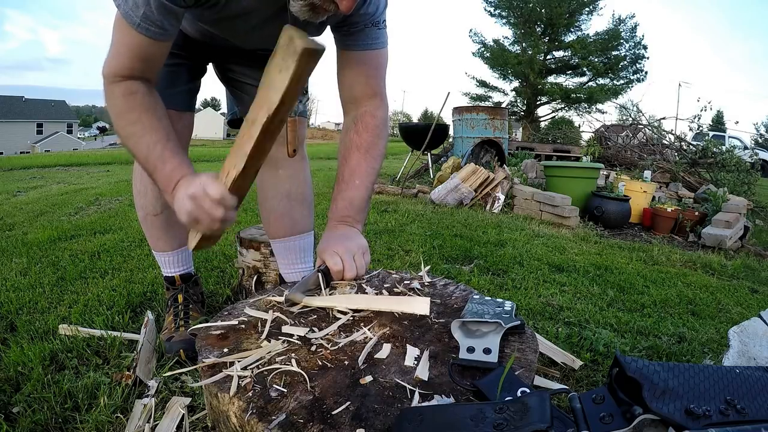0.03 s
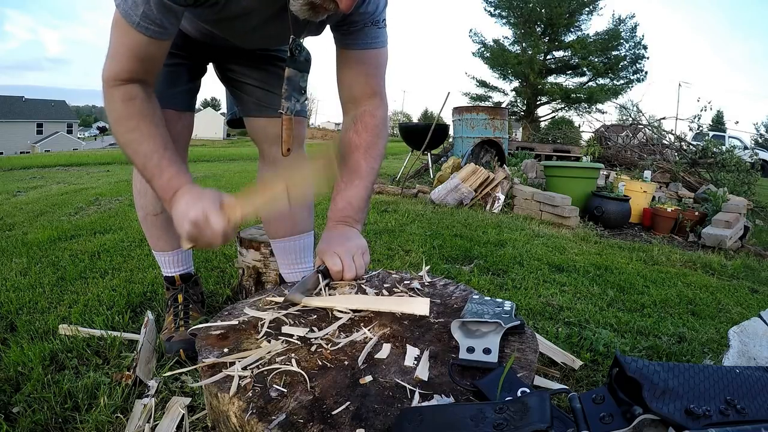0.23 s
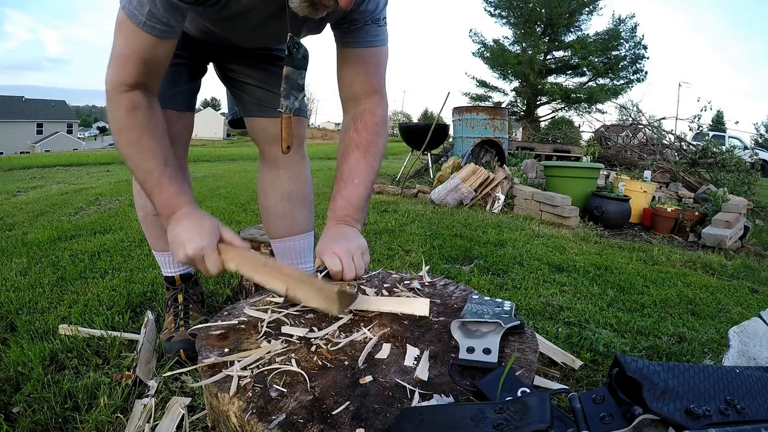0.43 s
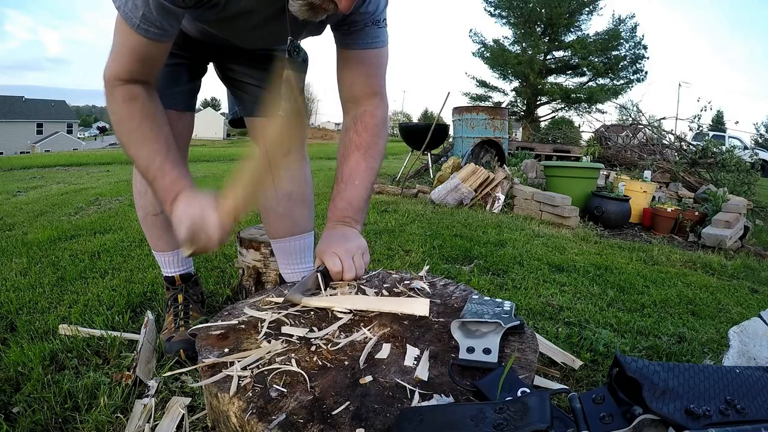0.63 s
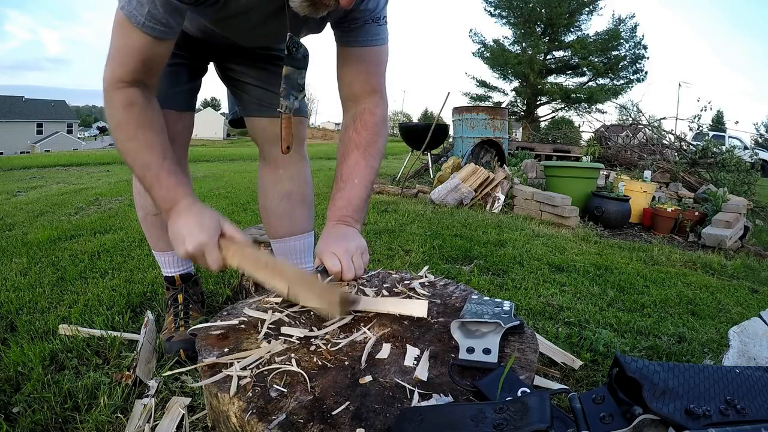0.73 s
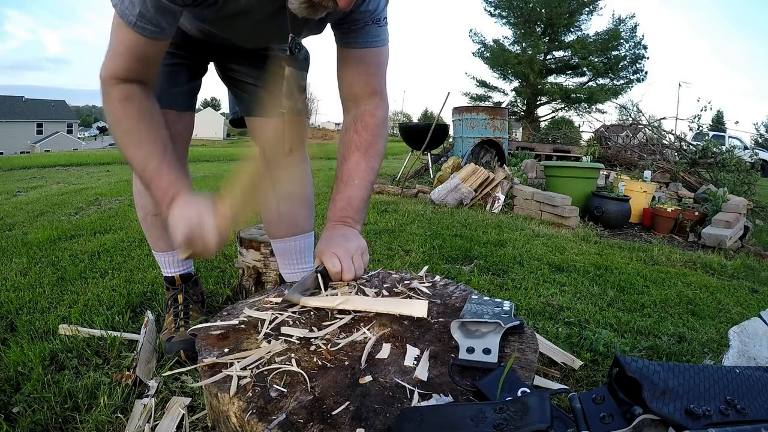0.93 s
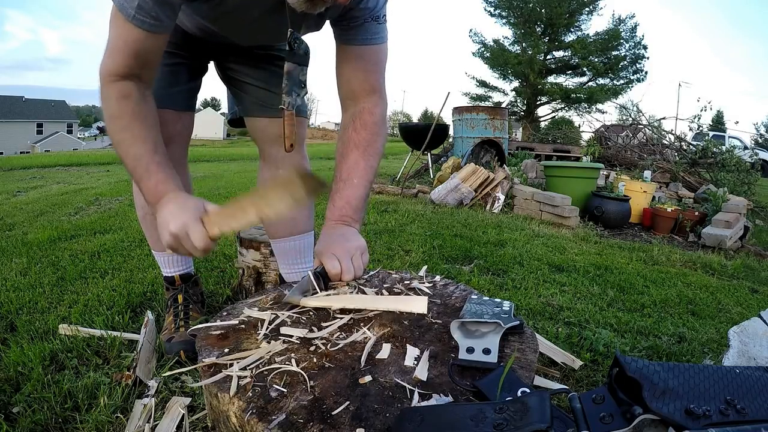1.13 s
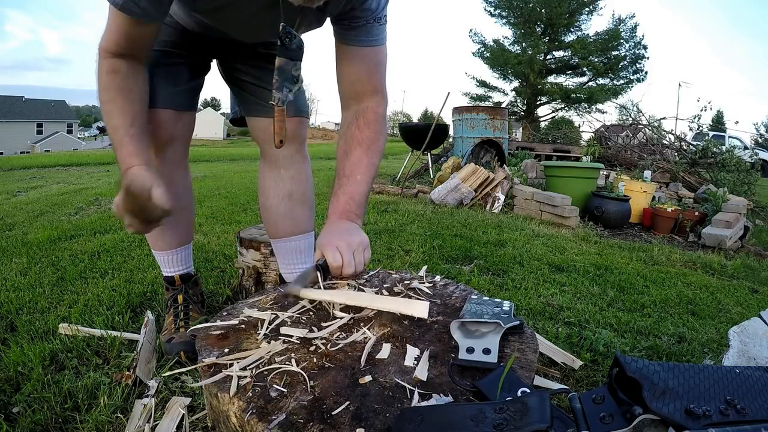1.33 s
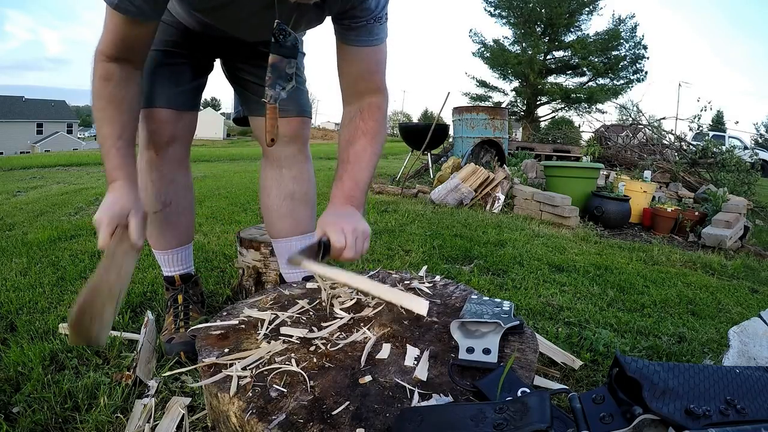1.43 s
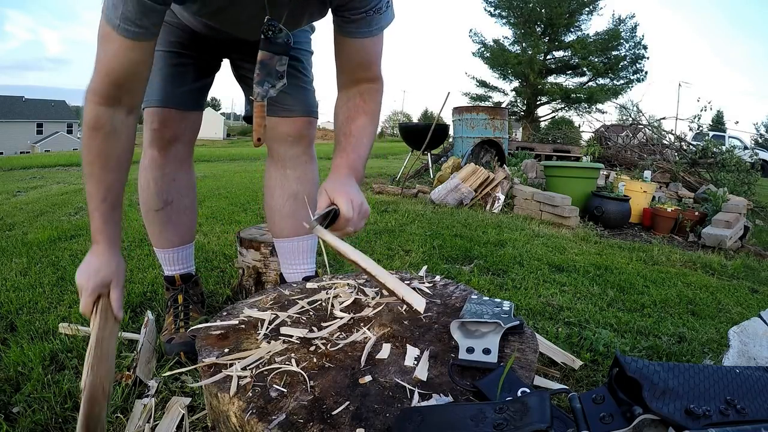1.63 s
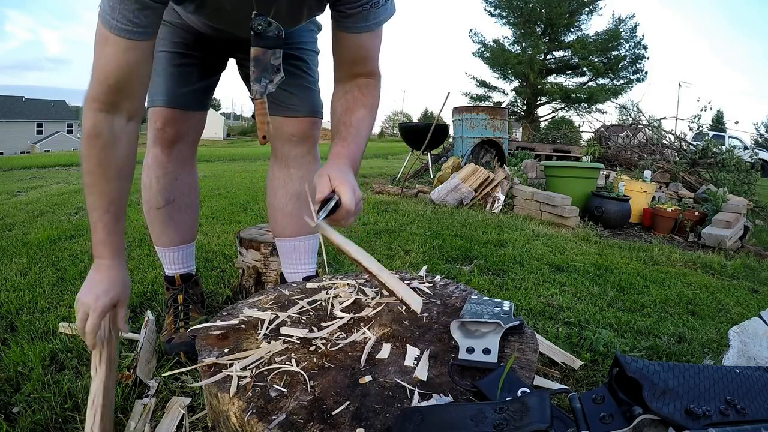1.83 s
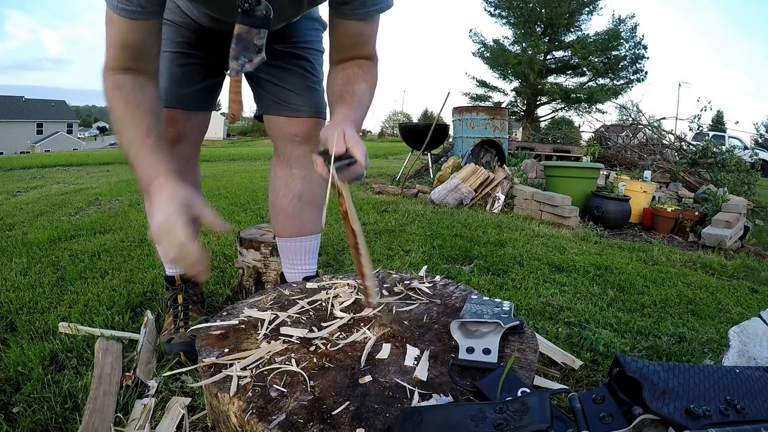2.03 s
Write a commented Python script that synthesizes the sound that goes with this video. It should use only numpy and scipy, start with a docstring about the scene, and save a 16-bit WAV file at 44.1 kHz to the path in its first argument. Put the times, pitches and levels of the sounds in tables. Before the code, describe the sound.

Wooden baton knocks a knife through a stick on a stump, four hard sharp blows outdoors

```python
"""Outdoors, close to a small camera that overloads: a wooden baton knocks a knife spine into a stick on a stump.
Each blow rings wood, blade and stump as dying sines, with noise for the crack and rattle; the baton bounces softly.
Far walls and trees send thin echoes back, and coloured noise makes wind and air.
The split stick ticks and the blade rubs at the end; thin high notes and a faint pulsing whine lie above."""
import sys
import numpy as np
from scipy import signal
from scipy.io import wavfile

SR = 44100
rng = np.random.default_rng(int(sys.argv[2]) if len(sys.argv) > 2 else 0)


def generate_wav(signal):
    """Clip the signal to [-1, 1] and save it as 16-bit WAV at the path in sys.argv[1]."""
    frames = np.transpose(np.atleast_2d(signal))
    scaled = np.clip(frames, -1, 1) * 32767
    pcm = np.round(scaled).astype(np.int16)
    wavfile.write(sys.argv[1], SR, pcm)


def volts(x):
    """Linear amplitude factor 10**(x/20) for a level x in dB, scalar or array-like."""
    e = np.asarray(x, float) / 20
    return 10 ** e


N = 92610  # samples, 2.1 s


def curve(points, x):
    """Straight lines between the points of a table."""
    return np.interp(x, *np.transpose(points))


def colour(x, points):
    """Causal minimum-phase filter of unit energy, drawn from a spectrum of relative levels."""
    point_hz, point_db = np.transpose(points)
    bin_hz = np.abs(np.fft.fftfreq(8192, 1 / SR))
    bin_db = np.interp(np.log(bin_hz + 1), np.log(point_hz + 1), point_db)
    log_gain = np.log(volts(np.maximum(bin_db, -100)))
    phase = -signal.hilbert(log_gain).imag
    taps = np.fft.ifft(np.exp(log_gain + 1j * phase)).real[:4096]
    return signal.oaconvolve(x, taps / np.linalg.norm(taps))[:len(x)]


def add(mix, start_s, sound):
    """Lays a sound into the mix in place, cut off where the mix ends."""
    part = mix[round(start_s * SR):][:len(sound)]
    part += sound[:len(part)]


def ring(modes, t, detune):
    """Struck body: dying sines, each off its listed pitch by up to the share detune."""
    pitch_factors = 1 + detune * (2 * rng.random(len(modes)) - 1)
    total = 0
    for (pitch_hz, level_db, t60_s, swing), factor in zip(modes, pitch_factors):
        envelope = volts(level_db - 60 * t / t60_s)
        total = total + np.sign(swing) * envelope * np.sin(2 * np.pi * pitch_hz * factor * t)
    return total


def lumpy(rate_hz, depth_db):
    """Noise whose level wanders between random steps."""
    steps = rng.standard_normal(2000)
    wander = np.interp(np.arange(N) / SR * rate_hz, np.arange(2000), steps)
    return volts(depth_db * wander) * rng.standard_normal(N)


def blow(strength_db, crack_db, thud_db, blade_db):
    """Wood, blade and stump ring at once with a crack; the ground follows, a rattle outlasts the crack."""
    # Mode tables: pitch_hz (before detuning), level_db (relative), t60_s, first swing (out 1, in -1)
    # Baton and stick
    wood_modes = [(640, -2, 0.033, 1), (918, -13, 0.052, -1), (982, -2, 0.023, 1), (1415, -10.5, 0.033, -1),
                  (1677, -3, 0.015, -1), (1861.5, 8.5, 0.0065, -1), (2094, 3, 0.011, 1),
                  (2826, -0.5, 0.015, 1), (3220, -7.5, .017, 1), (3281, -6.5, 0.008, 1),
                  (3880, -24, .02, -1), (4387, -17.5, 0.014, -1), (4830, -11.5, 0.018, -1)]
    # Blade, freer as the stick splits
    blade_modes = [(1320, -4, .017, -1), (2150, -11, .03, 1), (2557, 0, .016, 1), (4330, -7, .02, -1),
                   (4520, -8, .018, -1), (5120, -11, .02, 1), (5520, -16, .016, -1)]
    # Stump
    stump_modes = [(187.5, -8.5, 0.045, 1), (257.6, -16, 0.079, 1), (314, -3, 0.051, 1),
                   (421, -4, 0.031, 1), (500, -11, 0.037, -1), (602, -11, 0.019, 1)]
    # The soil's shudder through the camera stand
    ground_modes = [(59, -15, .28, 1), (71, -17, 0.21, 1)]
    # Spectrum of the crack: frequency_hz, level_db (relative, per Hz)
    crack_colour = [(500, -25.5), (1000, -9), (1850, 1.5), (3300, 3), (4400, -10), (6000, -16),
                    (8000, -24.5), (13300, -23.5), (16000, -47)]
    # Spectrum of shavings and near ground rattling: frequency_hz, level_db (relative, per Hz)
    rattle_colour = [(240, -11), (400, 21), (588, -20.5), (1010, -12.5), (1250, -27.5), (4440, -34.5),
                     (14100, -43), (16000, -59)]
    detune = .012  # share of the pitch
    ring_level_db, thud_level_db, ring_rise_s = -1, -0.5, .00015
    ground_lag_s, ground_rise_s = .0025, .003
    crack_level_db, crack_t60_s, crack_rise_s = -11, .022, .0005
    rattle_level_db, rattle_t60_s = -17.5, 0.067

    t = np.arange(SR // 3) / SR
    wood = ring(wood_modes, t, detune)
    blade = volts(blade_db) * ring(blade_modes, t, detune)
    stump = ring(stump_modes, t, detune)
    late = np.maximum(t - ground_lag_s, 0)
    ground = (1 - np.exp(-late / ground_rise_s)) * ring(ground_modes, late, detune)
    body = volts(ring_level_db) * (wood + blade) + volts(thud_level_db + thud_db) * (stump + ground)
    body = (1 - np.exp(-t / ring_rise_s)) * body

    crack_noise, rattle_noise = rng.standard_normal((2, len(t)))
    crack_fade = volts(crack_level_db + crack_db - 60 * t / crack_t60_s)
    crack = crack_noise * (1 - np.exp(-t / crack_rise_s)) * crack_fade
    rattle = rattle_noise * volts(rattle_level_db - 60 * t / rattle_t60_s)
    return volts(strength_db) * (body + colour(crack, crack_colour) + colour(rattle, rattle_colour))


def bounce(*levels_db):
    """The baton settling back on the spine: a blow that lands softly and dull."""
    settle_s, soft_hz = .0015, 3520
    dull = signal.lfilter(*signal.butter(1, soft_hz, fs=SR), blow(*levels_db))
    t = np.arange(len(dull)) / SR
    return dull * (1 - np.exp(-t / settle_s))


def knocks(lead_s):
    """All blows and bounces, with a lead-in for the blow that falls just before the start."""
    # Blows: start_s, strength_db, crack_db, thud_db, blade_db (all relative)
    blow_times = [(-.0695, 1, 3, 0, -8), (.21255, 0, 5, 0, -12), (.49085, 0, 6, -1, -6),
                  (.77015, 0, 5, 0, -8), (1.06655, 0, 8, -4, 0)]
    # Bounces: start_s, strength_db, crack_db, thud_db, blade_db (all relative)
    bounce_times = [(.244, -20, 2, 3.5, -12.5), (.505, -32, 13, 0.5, -0.5), (.527, -21.5, 0.5, 5.5, -12.5),
                    (.785, -31, 5, 1.5, -9.5), (0.794, -14.5, 0, 3.5, -11), (.812, -38, -1, 3, -11.5),
                    (1.076, -25, 7, -4.5, 2), (1.11, -51, 0, 9, 8)]
    out = np.zeros(N + lead_s * SR)
    for start_s, *levels_db in blow_times:
        add(out, start_s + lead_s, blow(*levels_db))
    for start_s, *levels_db in bounce_times:
        add(out, start_s + lead_s, bounce(*levels_db))
    return out


def forerunner(x):
    """A faint copy of the knocks that arrives ahead of them, likely through stump and soil."""
    early_s, early_db = 0.0025, -35
    return volts(early_db) * np.roll(x, -round(early_s * SR))


def yard(x):
    """A few walls and clumps of trees return the knocks, thin and late."""
    # Far walls: delay_s, level_db (relative)
    walls = [(.1022, -53), (.132, -58), (.160, -59), (.211, -59), (.2225, -57), (.327, -67)]
    # Scatter from trees: delay_s, level_db (relative)
    trees = [(.1, -100), (.115, -88), (.16, -88), (.23, -90), (.26, -98), (.4, -110)]
    # Colour of what returns: frequency_hz, level_db (relative, per Hz)
    far_colour = [(800, -42.5), (1300, -19), (2200, -6.5), (2800, -4), (3300, 4), (3900, -0.5),
                  (4400, -5.5), (6000, 1), (8000, -24), (12000, -60.5)]
    t = np.arange(SR // 2) / SR
    first_scatter_s = trees[0][0]
    echoes = volts(curve(trees, t)) * lumpy(150, 2.5)[:len(t)] * (t > first_scatter_s)
    for delay_s, level_db in walls:
        add(echoes, delay_s, volts(np.array([level_db])))
    return signal.fftconvolve(x, colour(echoes, far_colour))[:len(x)]


def tick(level_db, pitch_hz, snap_db):
    """A small dry tap: a few dying sines and a snap of noise."""
    # Modes of a tap: pitch_ratio (before detuning), level_db (relative), t60_s, first swing (out 1, in -1)
    tap_modes = [(.45, -8, 0.022, 1), (1, -3.5, 0.043, -1), (1.16, -8, .02, 1), (1.62, -0.5, 0.0052, -1)]
    # Spectrum of the snap: frequency_hz, level_db (relative, per Hz)
    snap_colour = [(800, -13), (2000, 2.5), (4000, 1.5), (8000, -12), (12000, -9.5), (15000, -19),
                   (16500, -30)]
    snap_t60_s = 0.051
    t = np.arange(SR // 10) / SR
    snap = volts(snap_db - 60 * t / snap_t60_s) * rng.standard_normal(len(t))
    modes = [(ratio * pitch_hz, *rest) for ratio, *rest in tap_modes]
    return volts(level_db) * (ring(modes, t, 0.016) + colour(snap, snap_colour))


def ticks():
    """Stick and knife tick as the split stick comes apart."""
    # Ticks: start_s, level_db (relative), pitch_hz (before ratio and detuning), snap_db (relative)
    tick_times = [(1.37, -65, 2036, 4), (1.565, -62, 1700, 1.5), (1.867, -62.5, 2120, -0.5),
                  (1.872, -56.5, 4300, -1.5), (1.9144, -50, 1860, -0.5), (1.9852, -32.5, 2216, -18),
                  (2.008, -43, 1830, -5.5), (2.013, -51.5, 3100, -15.5), (2.028, -51, 1750, -7.5)]
    out = np.zeros(N)
    for start_s, *settings in tick_times:
        add(out, start_s, tick(*settings))
    return out


def scrape():
    """Grainy rubbing of the blade, its noise shifting to another colour as the edge drags."""
    # Blade rub over time: time_s, level_db, edge_share (0-1)
    rub_path = [(1.84, -94, 0.12), (1.872, -63.5, .9), (1.9, -63.5, 0.6), (1.96, -71, 0), (2.01, -56, 0.3),
                (2.05, -62.5, .1), (2.1, -76.5, 0)]
    # Spectrum of the plain rub: frequency_hz, level_db (relative, per Hz)
    rub_colour = [(530, -48), (900, -3), (1950, -2.5), (2170, 3.5), (13700, -24.5), (15400, -26),
                  (16000, -38)]
    # Spectrum of the dragging edge: frequency_hz, level_db (relative, per Hz)
    edge_colour = [(2500, -5.5), (4300, -0.5), (5300, 5.5), (6500, -19.5), (9000, -31.5)]
    time_s, level_db, edge_share = np.transpose(rub_path)
    t = np.arange(N) / SR
    share = np.clip(np.interp(t, time_s, edge_share), 0, 1)
    grit = lumpy(300, 4)
    blend = (1 - share) * colour(grit, rub_colour) + share * colour(grit, edge_colour)
    return volts(np.interp(t, time_s, level_db)) * blend


def chirps():
    """Thin high notes: one steady sine, switched on briefly with soft edges."""
    # Notes: start_s, length_s, level_db
    note_times = [(-.01, 0.037, -62), (0.043, 0.039, -76), (.455, 0.022, -86)]
    pitch_hz, edge_s = 6355, .006
    t = np.arange(N) / SR
    gate = np.zeros(N)
    for start_s, length_s, level_db in note_times:
        inside_s = np.minimum(t - start_s, start_s + length_s - t)
        gate += volts(level_db) * np.clip(inside_s / edge_s, 0, 1)
    return gate * np.sin(2 * np.pi * pitch_hz * t)


def whine():
    """A faint very high sine that pulses through a clipped slow sine."""
    pitch_hz, level_db = 14175, -80
    pulses_per_s, phase_turns = 30, .73
    t = np.arange(N) / SR
    gate = np.clip(.5 + 1.5 * np.sin(2 * np.pi * (pulses_per_s * t + phase_turns)), 0, 1)
    return volts(level_db) * gate * np.sin(2 * np.pi * pitch_hz * t)


def wind():
    """Wind rumble: low coloured noise, rising and falling in gusts."""
    # Spectrum of the rumble: frequency_hz, level_db (relative, per Hz)
    wind_colour = [(8.8, -31), (15, -10), (54, 2), (115, -8.5), (253, -17), (358, -26.5), (392, -25.5),
                   (446, -29), (1200, -43), (1560, -65), (2640, -120)]
    # Gusts: time_s, level_db (before the lift below)
    gusts = [(0.0, -40.5), (0.41, -44.5), (0.52, -44.5), (1.01, -44), (1.07, -46), (1.39, -43.5),
             (1.75, -40), (2.1, -40)]
    lift_db = 2.5
    t = np.arange(N) / SR
    return volts(curve(gusts, t) + lift_db) * colour(lumpy(18, 0.83), wind_colour)


def air():
    """Open-air hiss: broad coloured noise that swells slowly."""
    # Spectrum of the hiss: frequency_hz, level_db (relative, per Hz)
    air_colour = [(290, -31), (500, -0.5), (718, -12.5), (988, -13.5), (2100, -10), (2930, -15),
                  (5000, -17), (8000, -24.5), (13400, -26.5), (15200, -36.5), (16000, -49)]
    # Swell: time_s, level_db (before the trim below)
    swell = [(0.0, -58.5), (0.36, -61.5), (0.78, -61.5), (1.4, -61.5), (1.61, -58.5), (2.1, -57.5)]
    trim_db = -4.5
    t = np.arange(N) / SR
    return volts(curve(swell, t) + trim_db) * colour(lumpy(60, .8), air_colour)


def scene():
    """Knocks with their forerunner and echoes, then the small sounds and the background."""
    lead_s = 1
    struck = knocks(lead_s)
    mix = (struck + forerunner(struck) + yard(struck))[lead_s * SR:]
    mix = mix + ticks() + scrape() + chirps() + whine() + wind() + air()
    return mix[None]


def band_limit(x):
    """A steep low-pass at the top of the band."""
    return signal.sosfilt(signal.butter(12, 16400, fs=SR, output="sos"), x)


def record(dry):
    """The input overloads on the blows with a firm knee; a low-pass then limits the band."""
    drive_db, knee = 0, 12
    edge_hz, ceiling = 16000, .94
    driven = dry * volts(drive_db)
    squashed = driven / (1 + np.abs(driven) ** knee) ** (1 / knee)
    limited = signal.oaconvolve(squashed, signal.firwin(101, edge_hz, fs=SR)[None], "same")
    return band_limit(ceiling * limited)


dry = scene()
out = record(dry)
generate_wav(out)
```